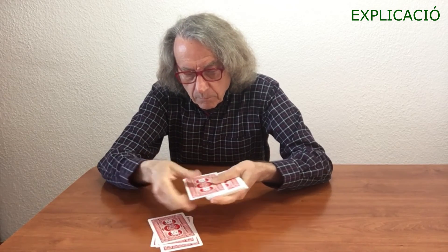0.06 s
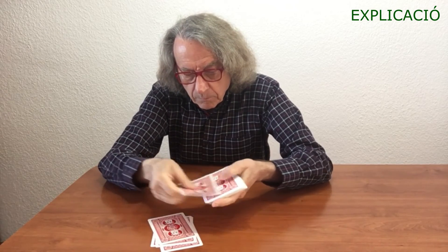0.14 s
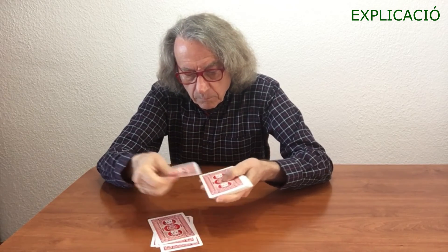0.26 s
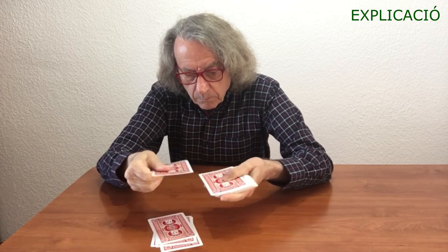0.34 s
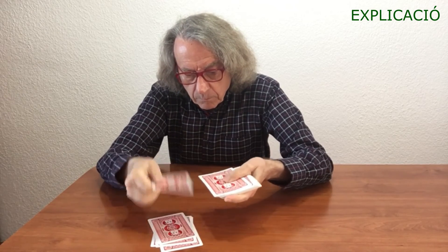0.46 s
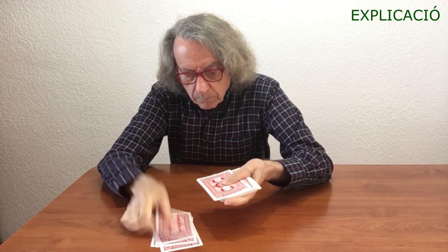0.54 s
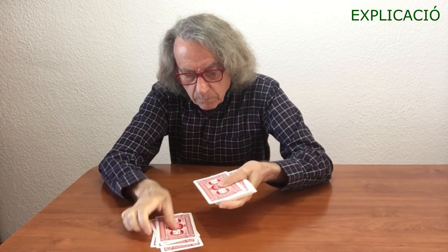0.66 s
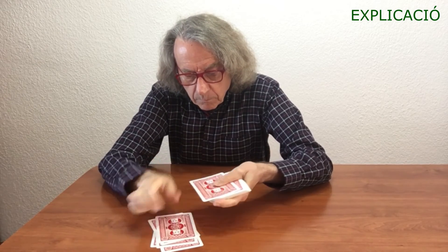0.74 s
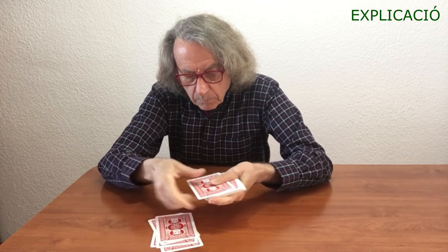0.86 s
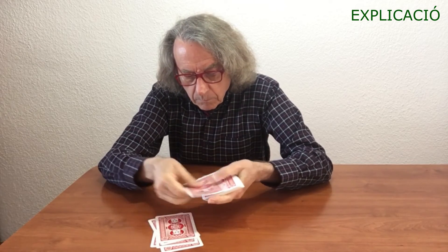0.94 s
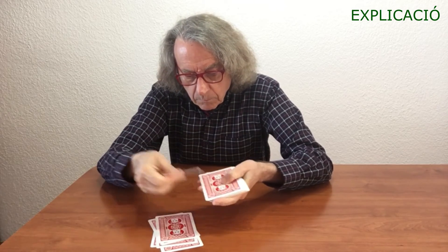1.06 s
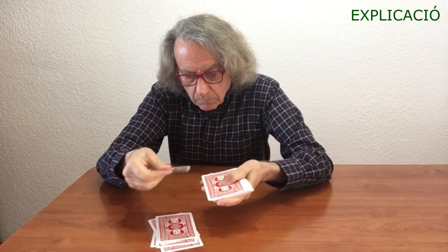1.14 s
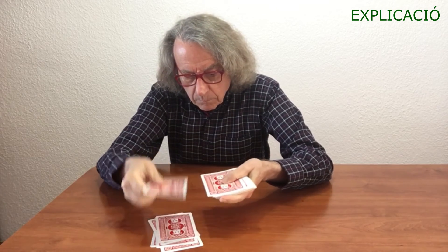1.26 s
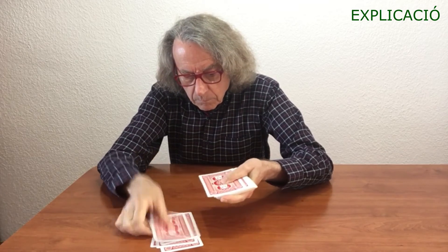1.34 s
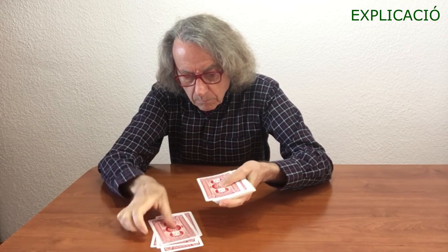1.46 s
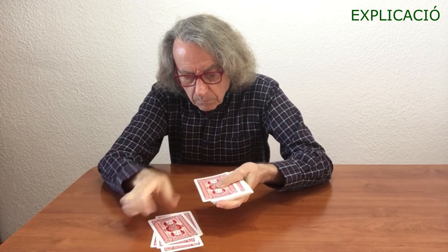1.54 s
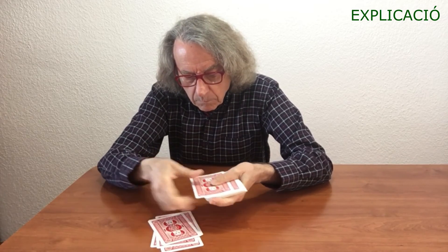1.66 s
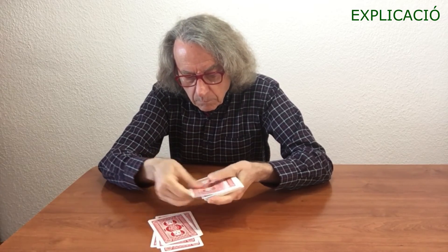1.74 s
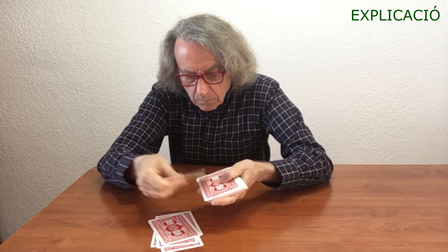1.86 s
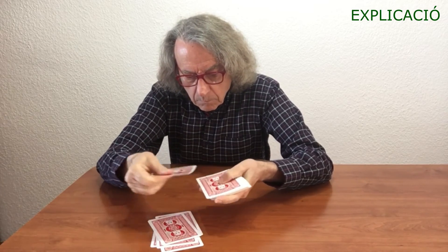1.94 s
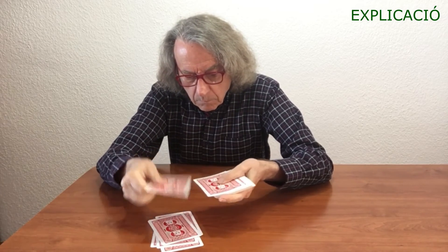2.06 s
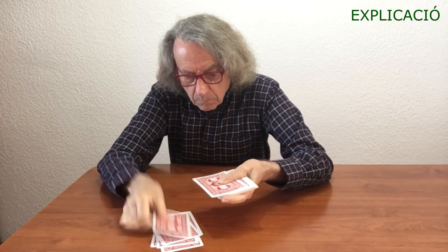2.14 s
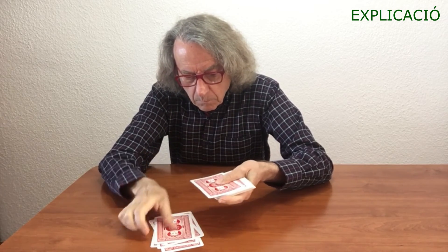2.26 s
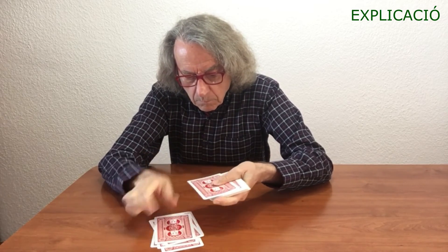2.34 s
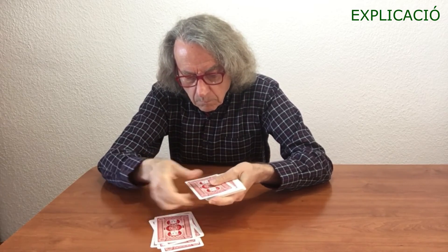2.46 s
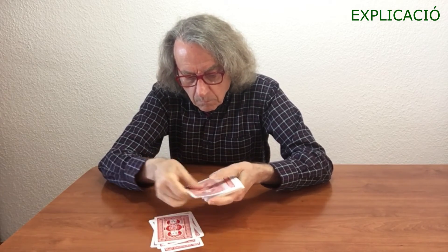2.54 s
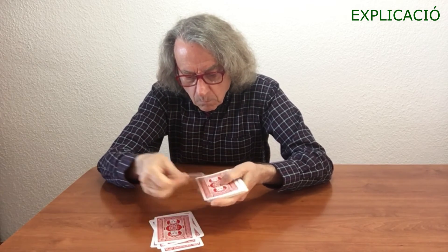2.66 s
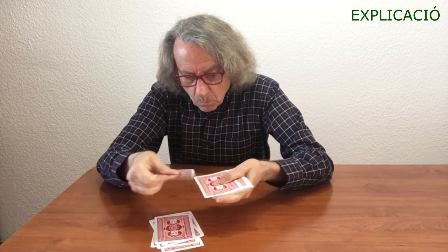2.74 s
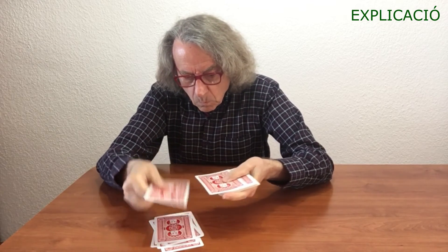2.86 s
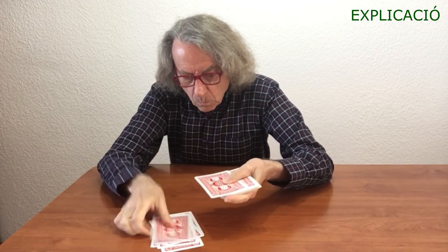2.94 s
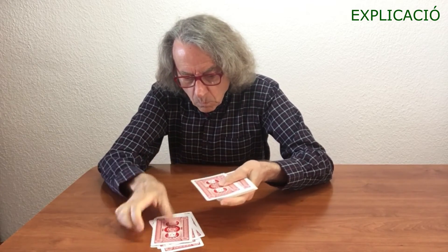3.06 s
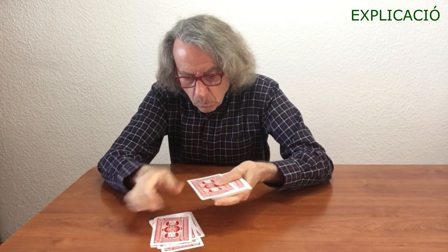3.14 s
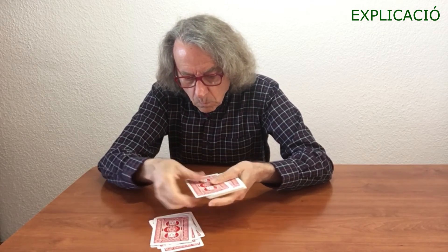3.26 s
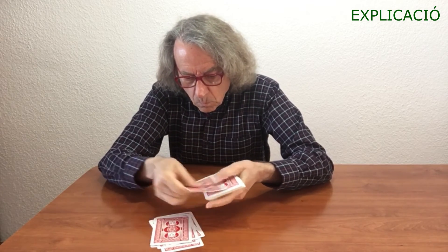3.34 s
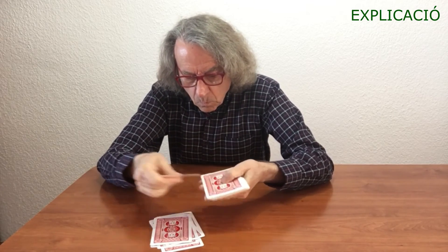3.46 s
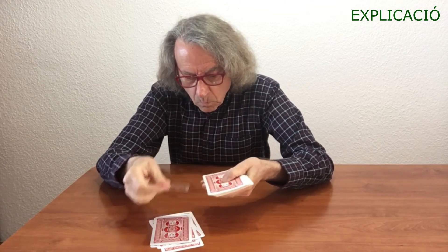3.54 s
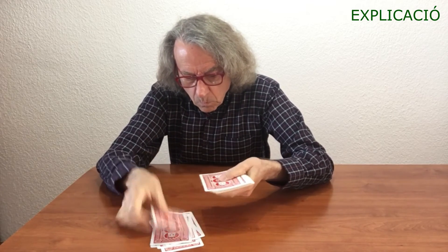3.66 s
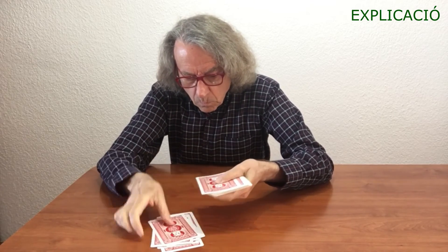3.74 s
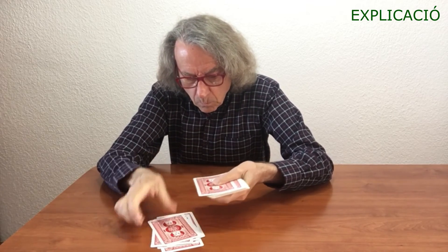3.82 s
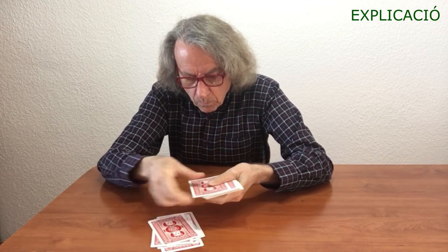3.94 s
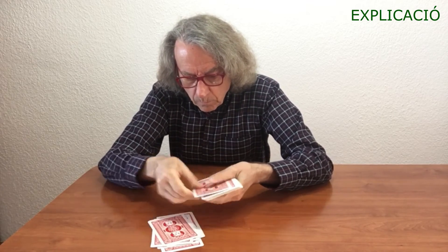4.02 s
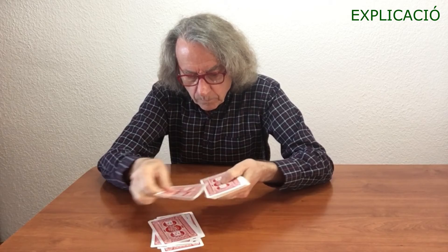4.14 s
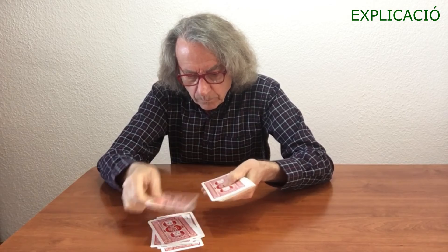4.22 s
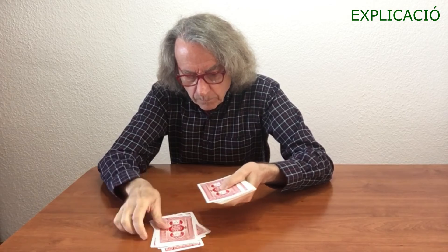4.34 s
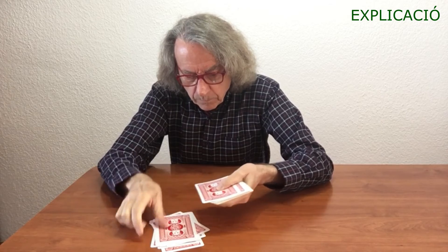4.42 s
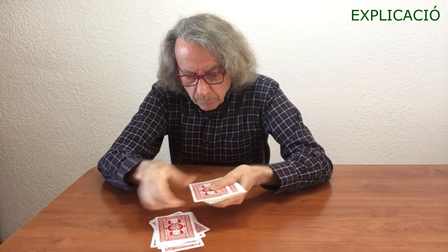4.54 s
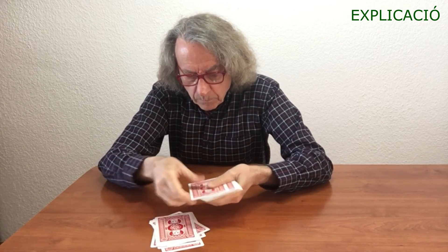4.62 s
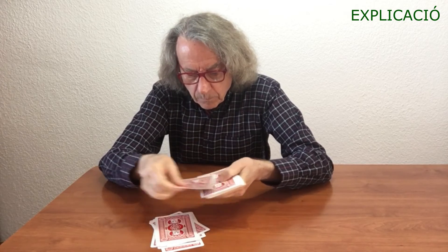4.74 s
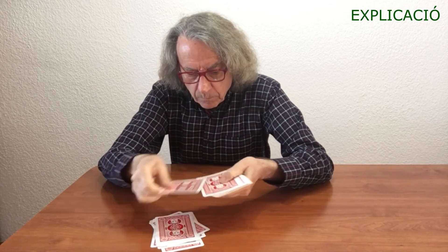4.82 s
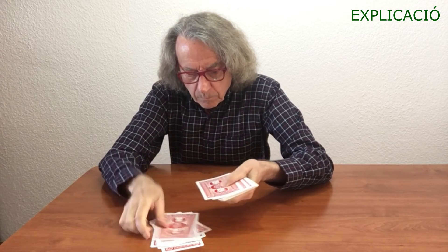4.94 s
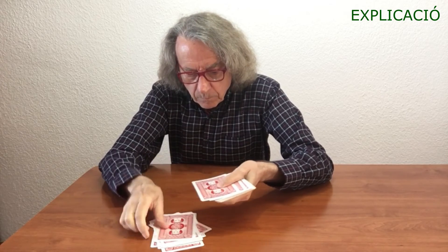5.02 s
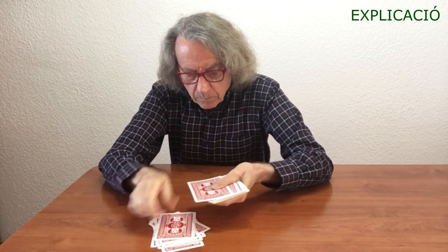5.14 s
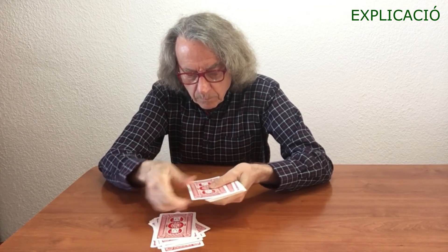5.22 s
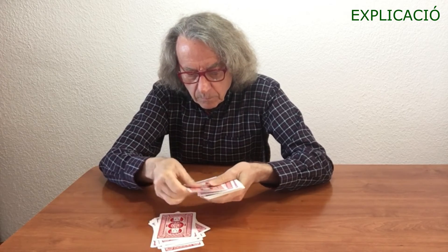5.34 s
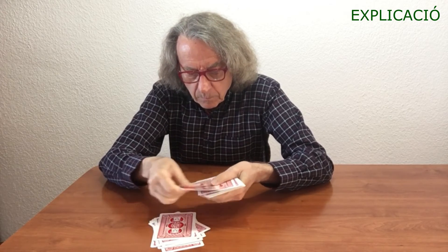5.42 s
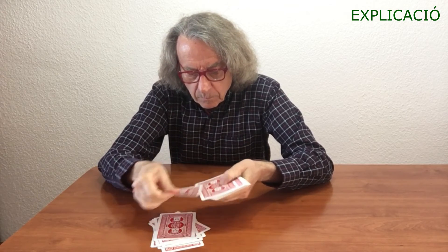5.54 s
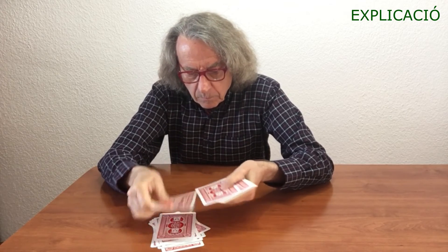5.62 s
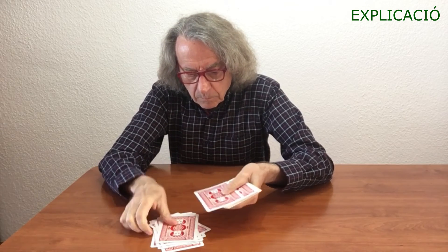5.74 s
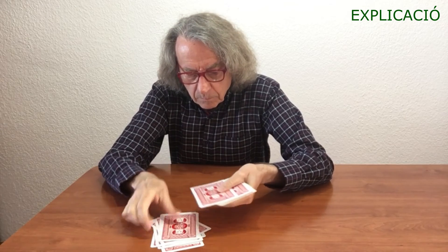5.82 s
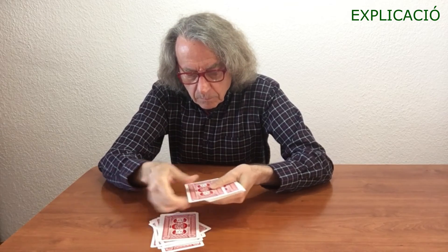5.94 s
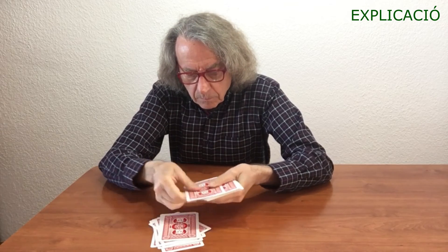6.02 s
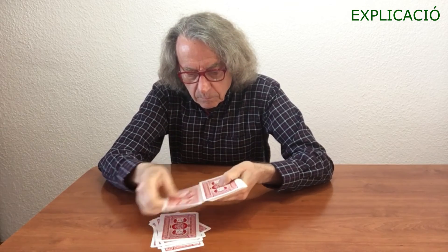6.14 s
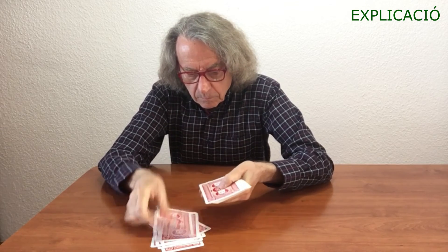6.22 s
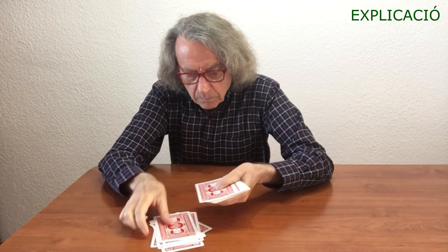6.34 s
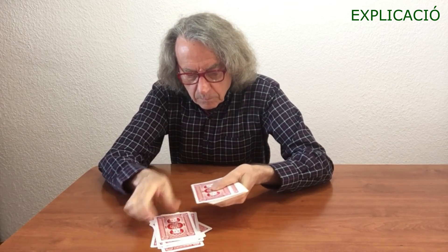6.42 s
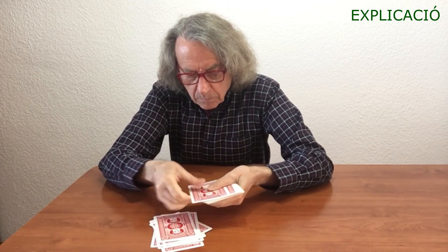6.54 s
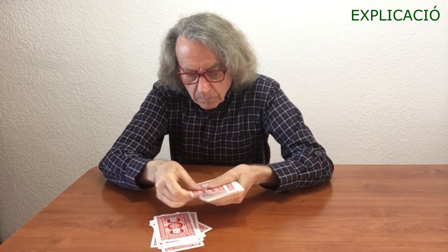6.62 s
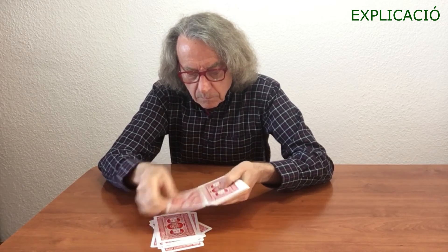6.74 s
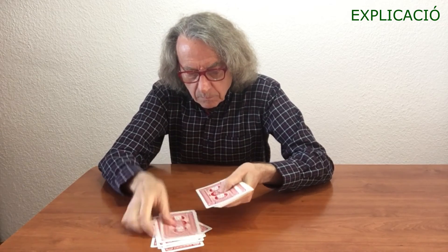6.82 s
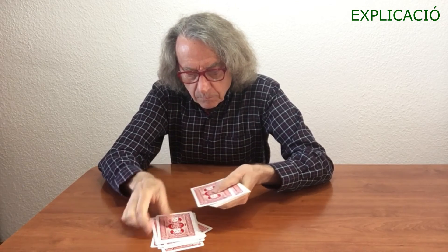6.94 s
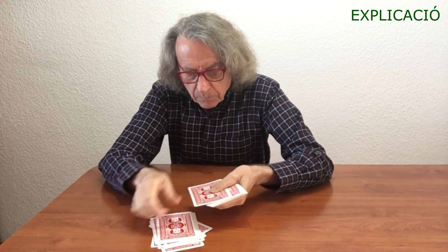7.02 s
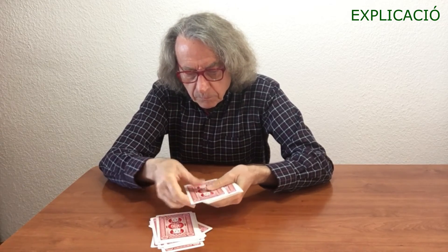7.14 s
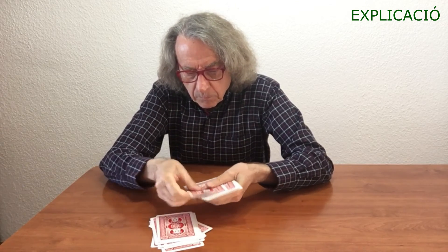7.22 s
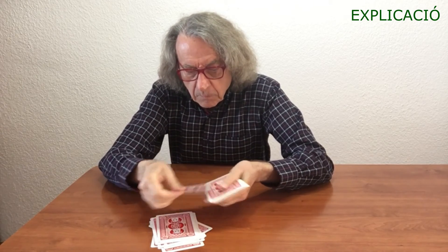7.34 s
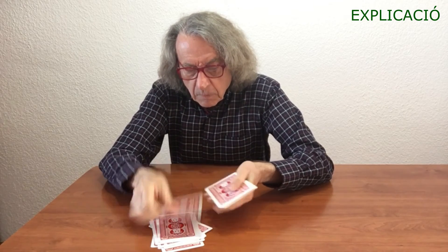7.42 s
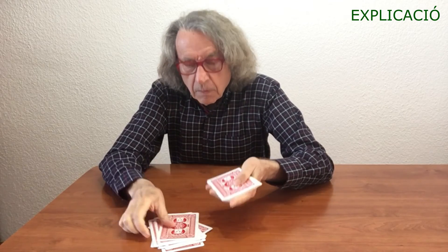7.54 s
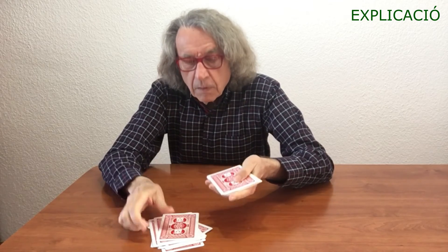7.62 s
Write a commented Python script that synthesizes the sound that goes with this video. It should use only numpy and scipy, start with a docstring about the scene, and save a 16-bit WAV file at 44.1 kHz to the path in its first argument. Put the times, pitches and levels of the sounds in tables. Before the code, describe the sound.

Cards are dealt singly from a held pack onto a pile on a wooden table, about one every three quarters of a second. Each gives a tiny tick and papery slide, then a sharp snap with a low woody thump beneath. The bare room adds a short, live reverberation; a very faint machine hum and soft air noise sit below. Single microphone nearby, mono.

```python
"""Dealing cards onto a wooden table

Playing cards are dealt one by one from a hand-held pack onto a pile on a wooden table in a bare room.
Each card ticks as it is gripped, hisses off the pack, snaps onto the pile and the fingers thump the table top.
Hiss and scuffs are uneven noise through card resonances; snaps are cracks that ring the card; trapped air pops
as a filtered puff; thumps are decaying table modes. A faint machine hum and air noise lie below."""
import sys
import numpy as np
from scipy import signal
from scipy.fft import rfft, irfft
from scipy.io import wavfile

SR = 44100
rng = np.random.default_rng(int(sys.argv[2]) if len(sys.argv) > 2 else 0)


def digitize_waveform(pressure):
    """Quantize a signal to 16-bit integers and store it at the path in sys.argv[1].

    Rows of a 2-D input are taken as channels; values are limited to [-1, 1].
    """
    field = np.atleast_2d(pressure).T
    bounded = np.clip(field, -1, 1)
    quanta = np.round(bounded * 32767).astype(np.int16)
    wavfile.write(sys.argv[1], SR, quanta)


def level_to_linear(level):
    """Convert decibel levels to linear amplitude factors, elementwise."""
    exponent = np.asarray(level, float) / 20
    return 10 ** exponent


N = 338763   # length in samples


def rms_one(x):
    """Scale to rms 1."""
    return x / np.sqrt(np.mean(x ** 2) + 1e-20)


def peak_one(x):
    """Scale to height 1."""
    return x / np.abs(x).max()


def add(out, start_s, sound):
    """Mix a sound in at a time."""
    at = round(start_s * SR)
    out[at:at + len(sound)] += sound[:N - at]


def at_hz(points, hz):
    """Read a curve of (hz, value) points on a log-frequency axis."""
    point_hz, value = np.transpose(points)
    return np.interp(np.log(hz), np.log(point_hz), value)


def drift(rate_hz):
    """Slow random wander of spread 1: noise through a double low-pass, drawn at every 40th sample."""
    r = np.exp(-2 * np.pi * rate_hz * 40 / SR)
    slow = signal.lfilter([1], [1, -2 * r, r * r], rng.standard_normal(N // 40 + 2002))
    slow = slow[2000:]   # past the filter's start
    slow = rms_one(slow - slow.mean())
    return np.interp(np.arange(N) / 40, np.arange(len(slow)), slow)


def resonate(x, peaks):
    """Parallel two-pole resonances (hz, width_hz, level_db) of alternating sign."""
    out = 0
    for k, (hz, width_hz, level_db) in enumerate(peaks):
        r = np.exp(-np.pi * width_hz / SR)
        gain = level_to_linear(level_db) * (-1) ** k * (1 - r * r) / 2
        poles = [1, -2 * r * np.cos(2 * np.pi * hz / SR), r * r]
        out = out + signal.lfilter(gain * np.array([1, 0, -1]), poles, x + 1e-18)
    return out


def rasp(size, spread_db):
    """Dense tiny catches of uneven size: the friction of paper."""
    size_db = spread_db * np.minimum(rng.exponential(1, size), 5)
    return rms_one(level_to_linear(size_db) * rng.standard_normal(size))


# Colour of the still air in the place, only its shape counts: hz, level_db (per Hz)
AIR_SPECTRUM = [(15, -50), (25, -14), (131, -0.5), (182, -4.5), (433, -8), (496, -17.5), (600, -12.5),
                (2330, -24.5), (4860, -26), (7300, -31), (12900, -30.5), (15200, -54), (16500, -60)]


def air_noise():
    """White noise coloured like the air of the room; its level wavers a little."""
    hz = np.maximum(np.fft.rfftfreq(N, 1 / SR), 10)
    noise = irfft(rfft(rng.standard_normal(N)) * level_to_linear(at_hz(AIR_SPECTRUM, hz)), N)
    return level_to_linear(-49 + 0.81 * drift(1.0)) * rms_one(noise)


# Lines of the faint machine: pitch_hz, level_db (rms)
HUM_LINES = [(134.6, -55.5), (371.4, -64.5), (441.4, -63.5), (597.5, -66), (699.8, -87), (802.1, -64.5),
             (979.8, -83), (1001, -67)]


def machine_hum():
    """Steady narrow lines whose phase and level waver slowly."""
    out = np.zeros(N)
    for pitch_hz, level_db in HUM_LINES:
        phase = 2 * np.pi * pitch_hz * np.arange(N) / SR
        phase += 1.11 * drift(1.55) + rng.uniform(0, 2 * np.pi)
        out += np.sqrt(2) * level_to_linear(level_db + 1.3 * drift(2.8)) * np.sin(phase)
    return out


# Resonances of a rubbed card, its treble, and the slow bending of its face: hz, width_hz, level_db
CARD_BODY = [(2940, 2360, 11.5), (4180, 860, -8.5), (5060, 2400, 13)]
CARD_TREBLE = [(8800, 2500, -2), (10800, 2500, 0), (13000, 2200, -3)]
CARD_BELLY = [(1028, 670, 8), (2160, 3450, 8.5), (3740, 290, -39)]


def card_voice(x, treble_db, belly_db):
    """Friction through the card's resonances; each part is first set to keep the level of its input."""
    unit = rng.standard_normal(SR // 4)
    body, treble, belly = (resonate(x, peaks) / np.std(resonate(unit, peaks))
                           for peaks in (CARD_BODY, CARD_TREBLE, CARD_BELLY))
    return body + level_to_linear(treble_db) * treble + level_to_linear(belly_db) * belly


# Card face sliding on card, fastest in mid stroke: fastest_s, swell_s, fade_s, level_db, treble_db
# (level_db is at the fastest point)
STROKES = [(.14, 0.027, 0.27, -49.5, -4.5), (.39, 0.21, 0.076, -60, -2), (.525, 0.05, 0.035, -58.5, 5),
           (0.941, .01, .08, -51, -6), (1.01, 0.082, 0.057, -44.5, 1.5), (1.217, 0.096, 0.055, -58.5, -1),
           (1.324, 0.043, 0.035, -54, 1), (1.74, 0.011, 0.014, -47, -6.5), (1.836, 0.091, 0.05, -49.5, 4),
           (2.026, 0.13, 0.062, -65.5, 5), (2.158, .06, .03, -58, 4), (2.541, 0.0083, 0.041, -50.5, -7),
           (2.635, 0.13, 0.075, -50.5, 2.5), (2.82, 0.098, 0.062, -57.5, 6), (2.924, .04, 0.024, -55, 1.5),
           (3.346, 0.072, 0.051, -56, -8), (3.403, 0.076, 0.038, -43.5, -3), (3.631, 0.063, .04, -53, -2),
           (4.04, 0.054, 0.24, -51.5, -5), (4.139, 0.16, 0.083, -49.5, 4), (4.239, .02, 0.054, -61, -5),
           (4.686, 0.08, .06, -58, -6.5), (4.76, .12, 0.068, -51.5, 1.5), (4.9, .03, 0.056, -46, -5.5),
           (5.345, 0.046, 0.18, -54.5, -6.5), (5.411, 0.045, 0.088, -57, 10),
           (5.465, .08, 0.076, -52.5, -3), (5.56, 0.021, 0.45, -55.5, -5), (6.053, 0.021, 0.037, -53, -8.5),
           (6.14, 0.098, 0.082, -45.5, 3), (6.584, 0.037, 0.032, -59, -2), (6.625, 0.011, 0.067, -58, -3),
           (6.743, .12, 0.11, -46, -0.5), (7.168, 0.054, .04, -49.5, -3), (7.251, 0.14, .1, -55.5, -1.5),
           (7.32, 0.098, 0.017, -45.5, -1.5), (7.424, .1, .04, -52.5, -6.5)]


def slide():
    """Paper friction with lone catches, a little uneven; each stroke swells to its fastest point and fades."""
    out = np.zeros(N)
    range_db = 20   # swell_s and fade_s each span this much level
    for fastest_s, swell_s, fade_s, level_db, treble_db in STROKES:
        t = np.arange(-min(2 * swell_s, fastest_s), 2 * fade_s, 1 / SR)
        stroke_db = level_db - range_db * np.where(t < 0, -t / swell_s, t / fade_s)
        caught = rng.random(len(t)) < 80.0 / SR   # about 80 catches a second
        catches = caught * rng.standard_normal(len(t)) * level_to_linear(18.0)
        paper = (rasp(len(t), spread_db=4.0) + catches) * level_to_linear(stroke_db)
        belly_db = -5 - 1.08 * treble_db   # a brighter, lighter stroke bends the face less
        add(out, fastest_s + t[0], card_voice(paper, treble_db, belly_db))
    return out * level_to_linear(3.7 * drift(34))


# Modes of the wooden table top: pitch_hz, level_db (added to the thump's), t60_s
TABLE_MODES = [(96.5, -19, 0.35), (121.5, -2.5, 0.66), (159.7, 13, 0.23), (186.3, 5, 0.37),
               (214.6, 4, 0.36), (249, 1.5, 0.39), (286, 5.5, 0.4), (326, 3.5, 0.13), (375.8, 6, 0.22),
               (431.5, 6.5, 0.15), (523, -2.5, 0.34), (611, 3.5, 0.14), (696, 8, 0.24), (780, 0, 0.19),
               (925, -5.5, 0.1)]
# Fingers press the card on the table: start_s, deep_db, middle_db, middle_hz (favoured), high_db
THUMPS = [(0.124, -47, -69, 393, -53), (0.606, -34, -40, 262, -50), (1.395, -35, -35, 465, -46),
          (2.217, -36, -48, 390, -50.5), (2.984, -33.5, -42.5, 330, -47), (3.715, -39, -43, 346, -52),
          (4.338, -34, -34, 390, -48.5), (4.981, -34.5, -36, 313, -41), (5.689, -52, -39.5, 414, -43.5),
          (6.288, -45, -42, 340, -46), (6.851, -30.5, -38.5, 281, -42), (7.492, -33.5, -39, 380, -43.5)]


def thumps():
    """A soft push strikes the table modes; where it lands sets which middle modes are favoured."""
    out, t = np.zeros(N), np.arange(SR // 2) / SR
    count = len(TABLE_MODES)
    for start_s, deep_db, middle_db, middle_hz, high_db in THUMPS:
        luck_db, phase = rng.normal(0, 2.35, count), rng.uniform(0, 2 * np.pi, count)
        scatter = rng.normal(1, .025, count)   # each mode's pitch is scattered a little from thump to thump
        for k, (pitch_hz, mode_db, t60_s) in enumerate(TABLE_MODES):
            if pitch_hz < 140:
                push_db = deep_db
            elif pitch_hz > 480:
                push_db = high_db
            else:
                push_db = middle_db - 8.0 * abs(np.log2(pitch_hz / middle_hz))   # falls 8 dB per octave away
            swell = 1 - np.exp(-t * pitch_hz / 0.17)   # a fingertip is soft: each mode builds over a cycle or so
            level_db = push_db + mode_db + luck_db[k] - 60 * t / t60_s
            add(out, start_s, level_to_linear(level_db) * swell * np.sin(2 * np.pi * pitch_hz * scatter[k] * t + phase[k]))
    return out


# Air squeezed under a card: pitch_ratio (to the pop's pitch), width_hz, level_db
AIR_POCKET = [(.8, 402, -1.5), (1, 400, 6.5), (1.17, 413, 3)]
# Air trapped under the card pops out: start_s, peak_db, pitch_hz
POPS = [(0.1241, -37.5, 1104), (0.6068, -31, 1623), (1.3753, -33.5, 910), (2.19, -36, 1115),
        (2.9825, -52, 1390), (4.9257, -29.5, 1466), (4.9553, -19.5, 1447), (5.668, -28, 1045),
        (5.6889, -16, 1403), (6.0498, -42.5, 1154), (6.8432, -29, 1197), (7.4383, -38, 1360),
        (7.4718, -18.5, 1290), (7.4875, -38, 1430)]


def pops():
    """A short rough puff rings the pocket of air under the card."""
    out, t = np.zeros(N), np.arange(SR // 8) / SR
    for start_s, peak_db, pitch_hz in POPS:
        flow = np.sin(2 * np.pi * pitch_hz * t) + 1.5 * rng.standard_normal(len(t))
        puff = t * np.exp(-t / .0014) * flow
        pocket = [(pitch_hz * ratio, width_hz, level_db) for ratio, width_hz, level_db in AIR_POCKET]
        add(out, start_s, level_to_linear(peak_db) * peak_one(resonate(puff, pocket)))
    return out


def ring_card(crack, edge_hz, width_hz, belly_db, treble_db):
    """A crack rings the card's edge, belly and treble, balanced by their peaks; whole scaled to height 1."""
    edge, belly, treble = (peak_one(resonate(crack, peaks))
                           for peaks in ([(edge_hz, width_hz, 0)], CARD_BELLY, CARD_TREBLE))
    return peak_one(edge + level_to_linear(belly_db) * belly + level_to_linear(treble_db) * treble)


# Card edges catch and snap: start_s, peak_db, belly_db, treble_db (both against the edge), scuff_db
SNAPS = [(0.1249, -20, -3.5, -14, -28.5), (0.145, -36, -6, -19, -44), (0.5815, -21, -1, -15, -48),
         (0.606, -15, -12, -3.5, -29.5), (0.938, -26.5, -25, -20, -33), (1.3656, -14.5, -20, -21, -34),
         (1.393, -17, -14, -13, -26), (1.739, -34, -12, -16, -44), (1.8502, -32.5, -24, -10, -44),
         (2.1694, -21, -12.5, -21, -28), (2.1998, -13.5, -22, -7, -49), (2.5363, -31.5, -8, -26, -48),
         (2.6796, -32, -23, -5, -48), (2.9497, -15.5, -4, 1, -31), (2.9757, -4.5, -8, -15, -18),
         (3.3044, -37, -19, -14, -34.5), (3.336, -31.5, -20, -19, -49), (3.7009, -20, 4, -11, -32),
         (3.7339, -21, -19, -16, -47), (4.0425, -32, -17, -21, -51), (4.2387, -31.5, -3, -25, -34),
         (4.3083, -25, 18, -10, -36), (4.3229, -32, 1, -11, -27.5), (4.339, -12, -12, -22, -43),
         (4.3501, -9, -23, 6, -45), (4.6802, -31, -12, -19, -47), (4.926, -36, 4, -3, -26),
         (4.9547, -15, -6, -6, -47), (4.9819, -12.5, -29, -30, -20.5), (5.3339, -35.5, -3, -25, -36),
         (5.6622, -19, 4, -20, -38), (5.682, -18.5, 1, -6, -23.5), (5.7005, -30, -20, -15, -45),
         (5.7095, -23.5, -15, -17, -45), (5.724, -31, -20, -6, -45), (5.7309, -23.5, -19, -3, -27.5),
         (6.043, -31, -15, -17, -38), (6.2114, -36, -3, -15, -35), (6.248, -27, -12, -15, -30),
         (6.258, -27, -4, -18, -34), (6.2726, -27, -6, -9, -48), (6.2922, -17.5, -25, -25, -40),
         (6.572, -40, -16, -14, -45), (6.6217, -33.5, -25, -18, -40), (6.814, -18, 3, -12, -48),
         (6.8358, -13, -11, -3, -38), (6.8525, -34, -20, -7, -43), (6.8589, -17, -24, -18, -43),
         (7.1645, -37, -16, -13, -38), (7.235, -36.5, -1, -15, -46), (7.444, -34, -1, -10, -39),
         (7.468, -15, 14, -1.5, -32), (7.4775, -24, -15, -10, -33), (7.4873, -16.5, -23, -24, -48),
         (7.4893, -9, -0.5, -3.5, -25.5), (7.4976, -15, -23, -18, -35)]


def snaps():
    """A crack, frayed over about a millisecond, rings the card, and a scuff dies away behind.
    Returns the sound towards the listener and the more even sound sent to all sides."""
    out, around, scuffs, t = np.zeros(N), np.zeros(N), np.zeros(N), np.arange(SR // 8) / SR
    click = 1. * (np.arange(len(t)) == round(.0005 * SR))
    for start_s, peak_db, belly_db, treble_db, scuff_db in SNAPS:
        edge_hz = 4750 * (1 + .04 * rng.standard_normal())   # the edge's ring differs from snap to snap
        fray = .35 * rng.standard_normal(len(t)) * np.exp(-t / .001)   # the edge frays as it lets go
        direct = ring_card(click + fray, edge_hz, 1320, belly_db, treble_db)
        spread = ring_card(click, edge_hz, 3200, belly_db + 2.0, treble_db + 4.5)
        add(out, start_s, level_to_linear(peak_db) * direct)
        add(around, start_s, level_to_linear(peak_db) * spread)
        add(scuffs, start_s, level_to_linear(scuff_db) * rasp(len(t), spread_db=-1.5) * np.exp(-t / 0.0035))
    scuffs = card_voice(scuffs, treble_db=-11.5, belly_db=-0.5)
    return out + scuffs, around + scuffs


# The card flattens and drags over the pile: start_s, length_s, level_db, treble_db
BRUSHES = [(0.58, 0.03, -40.5, -1), (1.367, 0.042, -37.5, -1), (2.174, 0.05, -41, -3.5),
           (2.959, 0.029, -40.5, -8), (2.977, 0.031, -33, 1), (3.693, 0.047, -45, 0),
           (4.332, 0.018, -40, 1), (4.93, 0.037, -61, 5), (4.95, 0.021, -33, -3.5), (5.651, 0.022, -44, -8),
           (5.686, 0.038, -50, 6.5), (6.252, 0.047, -41.5, -4), (6.8, 0.081, -45, 0.5),
           (7.43, 0.046, -49, -0.5), (7.47, 0.04, -43, 3)]


def brushes():
    """Crackling friction that swells in over a few milliseconds and dies when the card lies flat."""
    out, t = np.zeros(N), np.arange(SR // 8) / SR
    for start_s, length_s, level_db, treble_db in BRUSHES:
        swell = np.clip(t / 0.002, 0, 1)
        fade = np.exp(np.minimum(length_s - t, 0) / 0.0045)
        crackle = level_to_linear(level_db) * swell * fade * rasp(len(t), spread_db=7.5)
        add(out, start_s, card_voice(crackle, treble_db, belly_db=4))
    return out


# How long the bare room rings: hz, t60_s
ROOM_T60 = [(100, 0.89), (300, 0.64), (1000, 0.51), (3000, 0.53), (8000, 0.35), (14000, 0.38)]
# Nearest wall, a path some 2.2 m longer than the direct one: delay_s, level_db
ECHOES = [(.0065, -18)]


def room(x):
    """A wall echo and a diffuse tail that swells in after 3 ms and dies band by band."""
    t, tail = np.arange(SR) / SR, 0
    edges = 50 * 2 ** np.arange(0, 8.6, .5)   # half-octave bands
    for low, high in zip(edges, edges[1:]):
        band_filter = signal.butter(2, [low, high], "band", fs=SR, output="sos")
        band = signal.sosfilt(band_filter, rng.standard_normal(SR))
        tail = tail + band * level_to_linear(-60 * t / at_hz(ROOM_T60, np.sqrt(low * high)))
    tail = tail * np.clip((t - .003) / 0.0009, 0, 1)
    response = level_to_linear(-.5) * tail / np.sqrt(np.sum(tail ** 2))   # tail energy in dB
    for delay_s, level_db in ECHOES:
        response[round(delay_s * SR)] += level_to_linear(level_db)
    return signal.fftconvolve(x, response)[:N]


def scene():
    """Cards and table, their room, and the background."""
    crack, crack_around = snaps()
    paper = brushes() + pops() + slide()
    table = thumps()
    # thumps are sent to the room 10 dB lower, keeping the low tail free of boom
    stirred = crack_around + paper + level_to_linear(-10.0) * table
    mix = crack + paper + table + room(stirred) + air_noise() + machine_hum()
    return mix[None, :]


def band_limit(x):
    """A steep low-pass at the top of the band."""
    return signal.sosfilt(signal.butter(12, 16650, fs=SR, output="sos"), x)


# Resonance of the microphone's port, added to everything it hears: hz, width_hz, level_db
MICROPHONE_PORT = (4900, 1200, -7.0)


def record(dry):
    """The microphone port lifts a band; the lowest bass and the top are lost."""
    x = dry + resonate(dry, [MICROPHONE_PORT])
    x = signal.sosfilt(signal.butter(2, 45, "high", fs=SR, output="sos"), x)
    x = signal.sosfilt(signal.cheby2(8, 50, 16300, fs=SR, output="sos"), x)
    return band_limit(x)


dry = scene()
out = record(dry)
digitize_waveform(out)
```